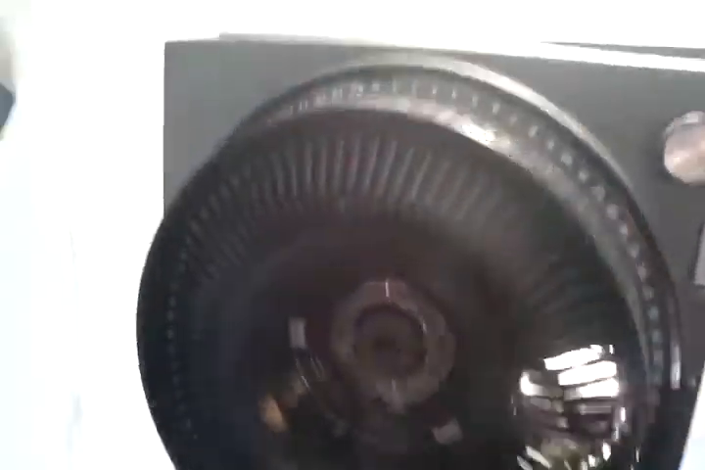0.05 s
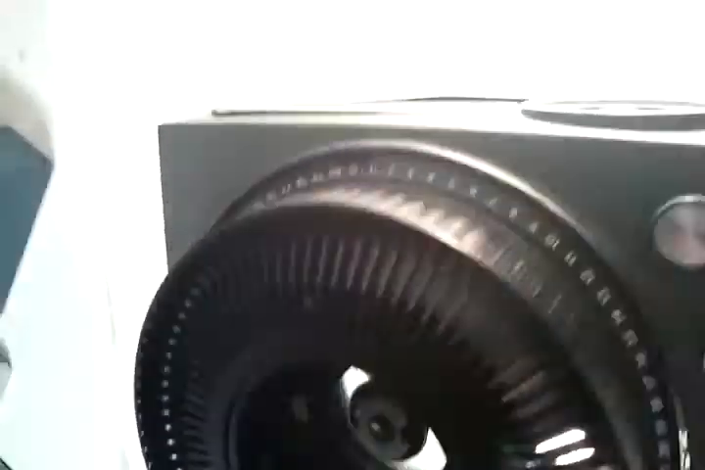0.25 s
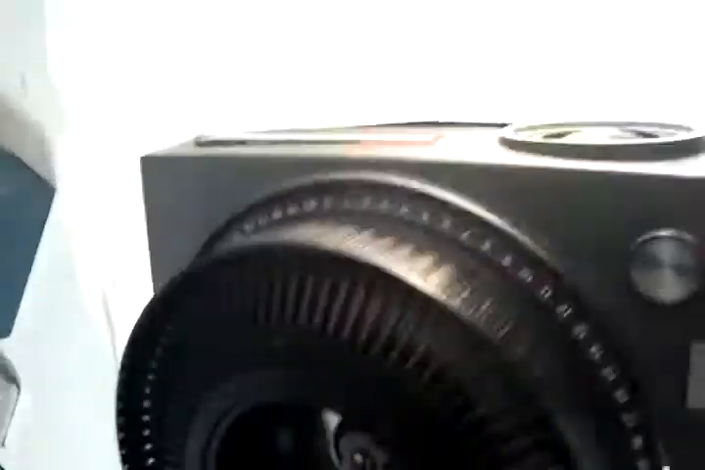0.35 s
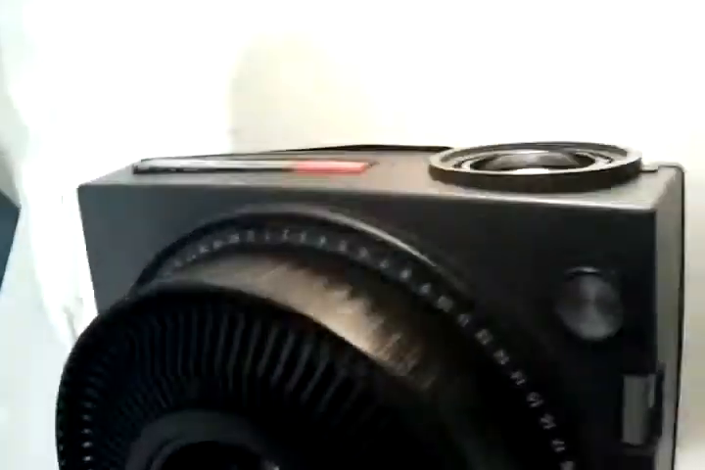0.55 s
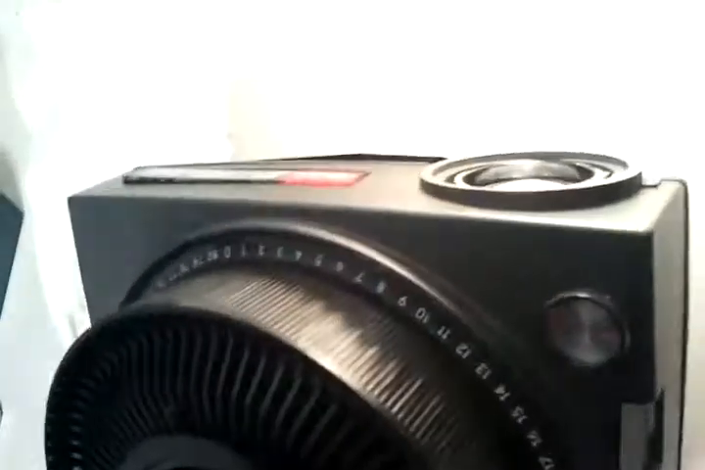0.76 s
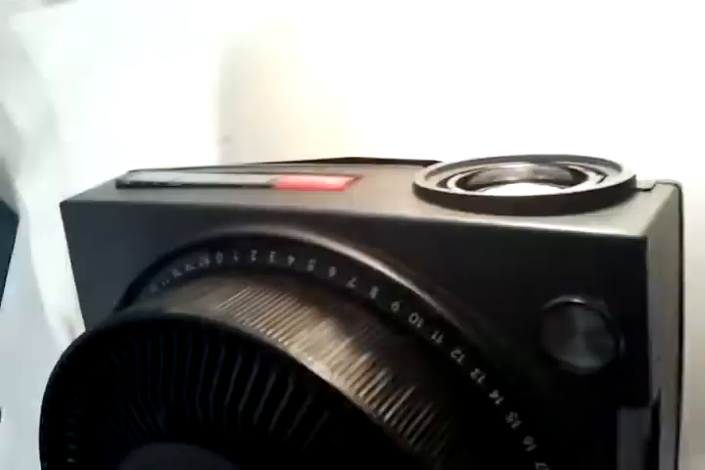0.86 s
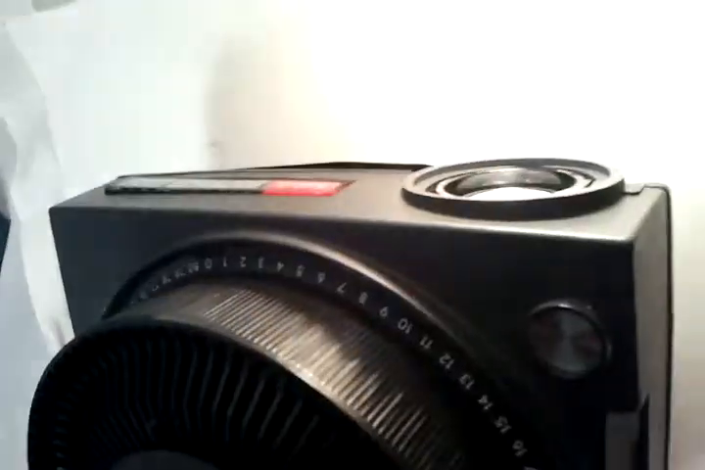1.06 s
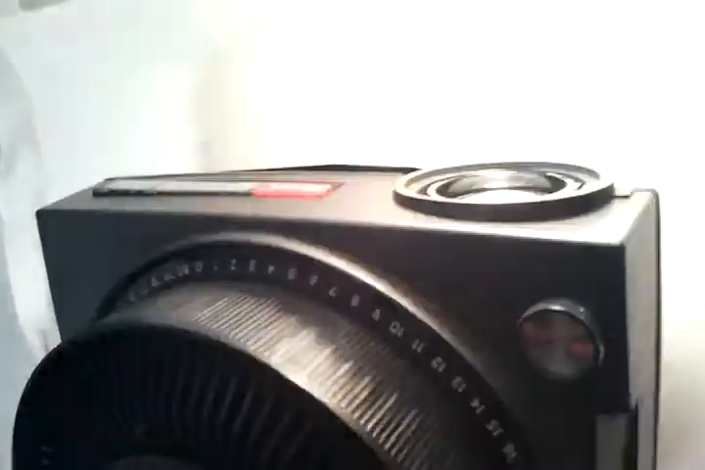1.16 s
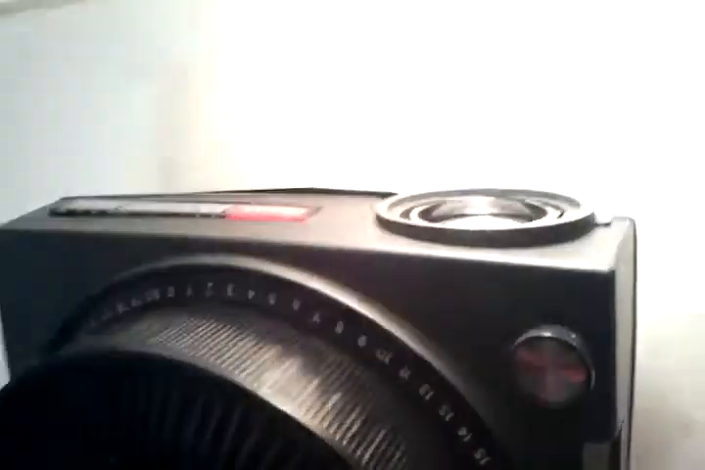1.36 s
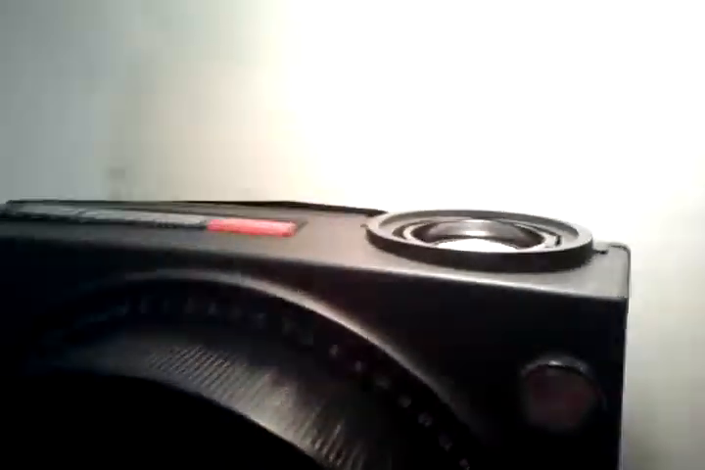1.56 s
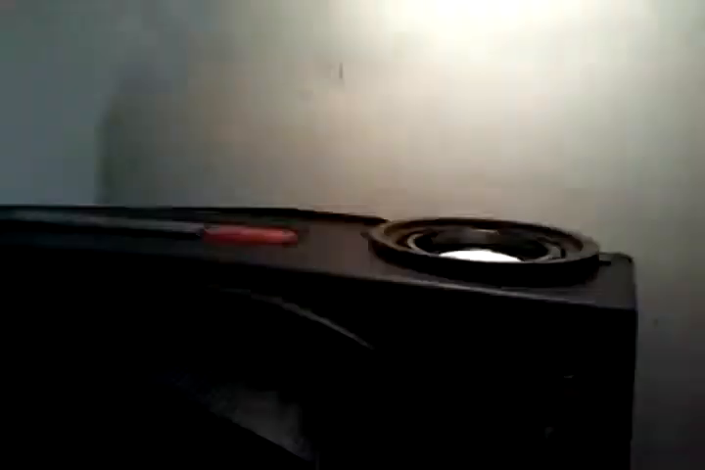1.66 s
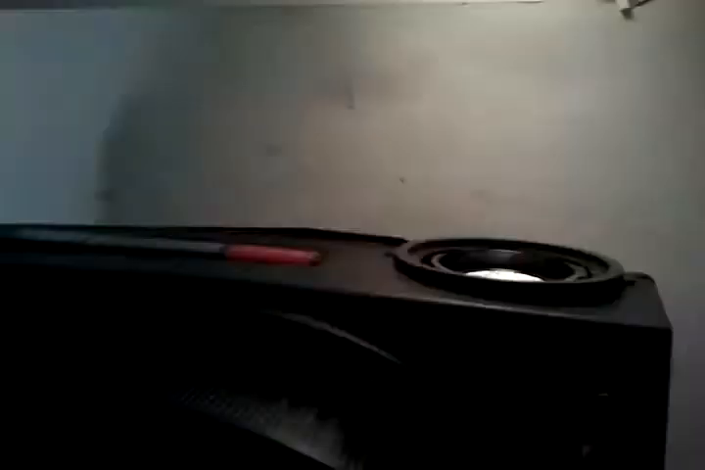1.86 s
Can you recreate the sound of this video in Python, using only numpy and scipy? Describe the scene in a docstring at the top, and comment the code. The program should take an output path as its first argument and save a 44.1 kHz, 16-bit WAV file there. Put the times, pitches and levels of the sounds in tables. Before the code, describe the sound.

Slide projector very close in a small room: a loud distorted clack, faint scrapes and knocks, a slide landing with a small metallic tick, then a second hard clack, over fast ticking, airy fan and low hum.

```python
"""Two clacks of a rotary slide projector changing one slide, close to the microphone in a small room.
Clacks: shaped noise and struck modes, both overloading the input. Between and around them,
tray and slide scrape (noise bursts), and the slide lands with a short ring and thud.
Throughout, the drive ticks twice a turn (pulses through a ringing snap), the fan rushes and whines
(shaped noise, wavering sines) and the motor hums (one sine)."""
import sys
import numpy as np
from scipy import signal
from scipy.fft import rfft, irfft
from scipy.io import wavfile
from scipy.ndimage import uniform_filter1d

SR = 44100
rng = np.random.default_rng(int(sys.argv[2]) if len(sys.argv) > 2 else 0)


def bounce(signal):
    """Save signal as a 16-bit WAV file at the path given by the first command-line argument."""
    frames = np.transpose(np.atleast_2d(signal))
    limited = np.clip(frames, -1, 1)
    pcm = np.round(limited * 32767).astype(np.int16)
    wavfile.write(sys.argv[1], SR, pcm)


N = 83790
TIME_S = np.arange(N) / SR

# clacks: start_s, clatter_db, ring_db, stroke (0 pull, 1 drop)
CLACKS = [(0.2205, 2, -5.5, 0), (1.5878, 2, -1, 1)]
# rebound of the lever, one row per stroke: delay_s, level_db (re first contact)
REBOUNDS = [(.009, -4), (.024, -5.5)]
# clatter spectrum of loose parts, lever pulling in: freq_hz, density_db (relative, per Hz)
PULL_CLATTER_SPECTRUM = [(70, -31), (150, -3), (260, -18.5), (420, 2), (650, -5), (1000, 2.5), (1400, -3),
                         (2300, 6.5), (3300, 2.5), (4900, -4), (7000, 0), (9000, -18.5)]
# same, lever dropping back: freq_hz, density_db (relative, per Hz)
DROP_CLATTER_SPECTRUM = [(40, -24), (150, -30), (260, -17), (420, -8), (650, -9.5), (1100, 10), (1500, 1),
                         (2300, 7), (3300, 9), (4900, -1), (7000, 6), (9000, -11)]
# modes of the mechanism: freq_hz, t60_s, pull_db, drop_db (both re ring_db)
MECHANISM_MODES = [(466.4, 0.14, -12, -18), (538, 0.39, -38, -30.5), (1050, 0.056, -4.5, -7),
                   (1128, 0.11, -27, -20), (1591, 0.1, -10.5, -11.5), (1987, 0.19, -6, -8),
                   (2061, 0.16, -26, -14.5), (2165, .12, -2, -14), (2263, 0.22, -6, -31),
                   (2305, 0.18, -12, -22), (2618, 0.057, -22, -33), (2676, 0.059, -21, -8),
                   (2760, 0.19, -10.5, -15), (3099, 0.073, -28, -2), (3388, 0.1, -6, -34),
                   (3800, 0.18, -17, -15), (5526, 0.14, -11, -45), (6075, 0.12, -21, -10.5),
                   (6230, 0.043, -27, -5.5)]
# scrapes and knocks of lever, tray and slide:
# start_s, rise_s, t60_s, level_db, tilt_db_per_octave, resonance_hz
SCRAPES = [(.192, 0.002, 0.18, -25.5, -2.5, 3400), (0.304, 0.0026, .05, -27.5, -6, 3360),
           (0.372, 0.0045, 0.16, -38, -4, 7000), (0.459, 0.0078, 0.053, -21.5, -2.5, 2330),
           (0.624, 0.0052, 0.057, -29, 0.5, 7930), (0.714, 0.015, .12, -38.5, -1, 7850),
           (0.756, 0.0034, 0.053, -30, -2, 2040), (.776, 0.0058, 0.15, -41, 3, 7760),
           (0.8689, 0.003, 0.022, -23.5, -0.5, 8080), (.872, 0.0055, 0.047, -27.5, -4.5, 870),
           (0.881, 0.0067, .07, -26.5, -4.5, 2030), (1.271, 0.005, 0.044, -21.5, 0, 6800),
           (1.281, .002, 0.049, -24, -6.5, 4000), (1.296, 0.0099, 0.099, -15, 1.5, 2366),
           (1.517, .002, 0.045, -35, -3, 7000), (1.558, 0.0032, 0.17, -24.5, -1.5, 1200),
           (1.665, .012, .06, -28.5, -7, 2040), (1.735, .012, 0.086, -36, -3, 5500),
           (1.826, 0.0063, 0.067, -22, 2, 1950)]
# common scrape spectrum: freq_hz, density_db (relative, per Hz)
SCRAPE_SPECTRUM = [(60, -13.5), (200, -8.5), (600, -11), (900, -7.5), (1250, -0.5), (1600, -2.5),
                   (2350, 2.5), (3000, -1.5), (4300, 0.5), (5400, -4.5), (7000, -1.5), (9000, -10)]
# modes of the gate: freq_hz, level_db (re LANDING_DB)
GATE_MODES = [(1550, -2), (2390, -11), (2750, -5), (4175, -22), (4430, 0), (4880, -9), (5915, -16),
              (6460, 1.5)]
# drive wheel speed: time_s, turns_per_s
DRIVE_SPEED = [(0.0, 21.87), (0.2, 22.65), (0.38, 21.81), (0.5, 22.34), (0.63, 21.27), (0.93, 21.47),
               (1.12, 23.09), (1.25, 22.31), (1.37, 23.04), (1.5, 21.88), (1.68, 22.58), (1.78, 21.33),
               (1.9, 21.37)]
# ticks of one turn: place_turns (0-1), level_db (relative)
TICKS = [(.348, -2.5), (.698, 0)]
# tick strength as the load changes: time_s, level_db
TICK_LEVEL = [(0, -17), (.25, -17.5), (.42, -21.5), (.52, -19), (.7, -21), (1.0, -20.5), (1.15, -18.5),
              (1.4, -18.5), (1.55, -21), (1.75, -18), (1.9, -20.5)]
# housing modes after each tick: freq_hz, t60_s, level_db (re HOUSING_DB)
HOUSING_MODES = [(2784, 0.011, 7.5), (3010, 0.09, -1.5), (3180, 0.11, -14), (3560, 0.0096, 10.5)]
# fan whine: time_s, pitch_hz, swell_db
FAN_WHINE = [(0, 772, 1.5), (.15, 779, 3.5), (0.399, 769, 2.5), (0.742, 744, -4), (0.899, 751, 1),
             (1.081, 775.2, 1.5), (1.501, 769.5, 2.5), (1.9, 752.2, 0)]
# fan tones: multiple (of the whine pitch), level_db (rms, before swell)
FAN_TONES = [(.612, -55), (1, -43), (1.388, -46), (3.69, -52.5)]
# air rush through the housing: freq_hz, density_db (relative, per Hz)
AIR_SPECTRUM = [(25, -4), (45, -14), (90, -1), (145, 2.5), (220, -6), (330, 0), (460, 1.5), (640, -4.5),
                (830, 4.5), (1050, 1), (1350, -7), (2000, -5), (3100, -4.5), (3800, -7), (4600, -18),
                (7200, -18), (9000, -33.5)]

CLACK_RISE_S, CLATTER_T60_S, REBOUND_T60_S = 0.0011, 0.1, 0.032
ROOM_DB, ROOM_RISE_S, ROOM_T60_S = -25, 0.024, 0.28
RATTLE_DB, RATTLE_PER_S = 1.8, 300
RING_RISE_S, RING_WAVER_RAD, RING_WAVER_DB = 0.0077, 0.72, 2.4
RESONANCE_DB, RESONANCE_WIDTH_HZ = 9.5, 160
LANDING_S, LANDING_DB, GATE_T60_S = 1.2985, -25, 0.075
THUD_HZ, THUD_DB, THUD_RISE_S, THUD_T60_S = 72, -39, 0.015, 0.11
TICK_HZ, TICK_TIME_CONSTANT_S, TICK_SCATTER_DB = 3133, 0.00038, 1.3
HOUSING_DB, HOUSING_RISE_S = -20, 0.0022
FAN_WAVER_DB, FAN_PITCH_WAVER = 2, 0.00318  # pitch waver: fraction of pitch
HUM_HZ, HUM_DB, HUM_WAVER_DB = 121, -48, 1.4
AIR_DB, AIR_FLICKER_DB = -35.5, 0.6
OVERLOAD, RAIL = 0.67, 0.82  # amplitudes
BASS_EDGE_HZ, LOWPASS_EDGE_HZ, TOP_HZ = 64, 8310, 15700


def undb(db):
    """Decibels to gain."""
    return 10 ** (np.asarray(db) / 20)


def sine(freq_hz, time_s):
    """Sine of constant pitch, zero phase at time 0."""
    return np.sin(2 * np.pi * freq_hz * time_s)


def curve(time_s, value):
    """Breakpoints joined by straight lines."""
    return np.interp(TIME_S, time_s, value)


def walk(steps_per_s):
    """Random wander of spread near 1: smoothed random steps."""
    step = int(SR / steps_per_s)
    held = np.repeat(rng.standard_normal(N // step + 1), step)
    return np.sqrt(2) * uniform_filter1d(held, step)[:N]


def burst(start_s, rise_s, t60_s):
    """Envelope: straight rise, exponential fall."""
    age_s = TIME_S - start_s
    rise = np.clip(age_s / rise_s, 0, 1)
    return rise * np.exp(-np.log(1000) * np.maximum(age_s - rise_s, 0) / t60_s)


def noise(spectrum, tilt_db_per_octave=0, resonance_hz=None):
    """Noise of rms 1, shaped by a spectrum, a tilt above 700 Hz and an optional resonance."""
    freqs_hz = np.maximum(np.fft.rfftfreq(N, 1 / SR), 1)
    points_hz, points_db = np.array(spectrum).T
    shape_db = np.interp(np.log2(freqs_hz), np.log2(points_hz), points_db)
    shape_db = shape_db + tilt_db_per_octave * np.log2(np.maximum(freqs_hz, 700))
    if resonance_hz:
        offset = (freqs_hz - resonance_hz) / RESONANCE_WIDTH_HZ
        shape_db = shape_db + RESONANCE_DB / (1 + offset ** 2)
    shaped = irfft(rfft(rng.standard_normal(N)) * undb(shape_db), N)
    return shaped / shaped.std()


def ring(start_s, freq_hz, t60_s):
    """One struck mode; loose parts make its pitch and level waver."""
    phase_rad = 2 * np.pi * (freq_hz * (TIME_S - start_s) + rng.random())
    phase_rad = phase_rad + RING_WAVER_RAD * walk(70)
    level = burst(start_s, RING_RISE_S, t60_s) * undb(RING_WAVER_DB * walk(120))
    return level * np.sin(phase_rad)


def clacks():
    """The lever hits its stop and rebounds: parts clatter, the mechanism rings, the room answers."""
    out = np.zeros(N)
    for start_s, clatter_db, ring_db, stroke in CLACKS:
        stroke = int(round(stroke))
        delay_s, rebound_db = REBOUNDS[stroke]
        spectrum = [PULL_CLATTER_SPECTRUM, DROP_CLATTER_SPECTRUM][stroke]
        first = burst(start_s, CLACK_RISE_S, CLATTER_T60_S)
        rebound = undb(rebound_db) * burst(start_s + delay_s, CLACK_RISE_S, REBOUND_T60_S)
        room = undb(ROOM_DB) * burst(start_s, ROOM_RISE_S, ROOM_T60_S)
        envelope = np.sqrt(first ** 2 + rebound ** 2 + room ** 2)  # powers add
        rattle = undb(clatter_db + RATTLE_DB * walk(RATTLE_PER_S))
        out += rattle * envelope * noise(spectrum)
        for freq_hz, t60_s, *mode_db in MECHANISM_MODES:
            out += undb(ring_db + mode_db[stroke]) * ring(start_s, freq_hz, t60_s)
    return out


def scrapes():
    """Short, grainy rubs as the tray moves on and the slide shifts: resonant noise bursts."""
    out = np.zeros(N)
    for start_s, rise_s, t60_s, level_db, tilt_db_per_octave, resonance_hz in SCRAPES:
        grain = undb(level_db + 2 * walk(900))
        rub = noise(SCRAPE_SPECTRUM, tilt_db_per_octave, resonance_hz)
        out += grain * burst(start_s, rise_s, t60_s) * rub
    return out


def landing():
    """The slide lands in the gate: short metallic ring, soft thud in the housing."""
    out = np.zeros(N)
    for freq_hz, level_db in GATE_MODES:
        out += undb(LANDING_DB + level_db) * ring(LANDING_S, freq_hz, GATE_T60_S)
    thud = burst(LANDING_S, THUD_RISE_S, THUD_T60_S) * sine(THUD_HZ, TIME_S - LANDING_S)
    return out + undb(THUD_DB) * thud


def drive():
    """Two sharp ticks per turn of the wheel, each with a brief ring in the housing."""
    turns = np.cumsum(curve(*np.array(DRIVE_SPEED).T)) / SR
    pulses = np.zeros(N)
    for place_turns, level_db in TICKS:
        at = np.searchsorted(turns, np.arange(place_turns, turns[-1], 1))
        pulses[at] = undb(level_db + TICK_SCATTER_DB * rng.standard_normal(len(at)))
    pulses = pulses * undb(curve(*np.array(TICK_LEVEL).T))

    age = TIME_S / TICK_TIME_CONSTANT_S
    swell = (age / 2) ** 2 * np.exp(2 - age)  # peaks at 1 after two time constants
    tick = swell * sine(TICK_HZ, TIME_S)
    for freq_hz, t60_s, level_db in HOUSING_MODES:
        envelope = burst(0, HOUSING_RISE_S, t60_s)
        tick += undb(HOUSING_DB + level_db) * envelope * sine(freq_hz, TIME_S)
    return signal.fftconvolve(pulses, tick)[:N]


def fan():
    """Wavering sines locked to one changing pitch, over rushing air."""
    time_s, pitch_hz, swell_db = np.array(FAN_WHINE).T
    whine_hz = curve(time_s, pitch_hz) * (1 + FAN_PITCH_WAVER * walk(29.32))
    phase_rad = 2 * np.pi * np.cumsum(whine_hz) / SR
    tones = np.zeros(N)
    for multiple, level_db in FAN_TONES:
        tone_db = level_db + curve(time_s, swell_db) + FAN_WAVER_DB * walk(18.03)
        tones += undb(tone_db) * np.sin(multiple * phase_rad)
    air = undb(AIR_DB + AIR_FLICKER_DB * walk(40.31)) * noise(AIR_SPECTRUM)
    return np.sqrt(2) * tones + air  # sqrt(2): tone levels are rms


def motor_hum():
    """Motor hum: one sine of wavering level."""
    level = undb(HUM_DB + HUM_WAVER_DB * walk(12))
    return np.sqrt(2) * level * sine(HUM_HZ, TIME_S)  # level is rms


def scene():
    """Sum of all projector parts, one channel."""
    return (clacks() + scrapes() + landing() + drive() + fan() + motor_hum())[None]


def record(dry):
    """Overloaded input flattens the clacks, a steep low-pass dulls them, peaks above the rail clip again."""
    flat = dry / (1 + (dry / OVERLOAD) ** 4) ** (1 / 4)
    bass_cut = signal.butter(2, BASS_EDGE_HZ, "highpass", fs=SR, output="sos")
    steep_lowpass = signal.butter(26, LOWPASS_EDGE_HZ, fs=SR, output="sos")
    narrow = signal.sosfilt(steep_lowpass, signal.sosfilt(bass_cut, flat))
    clipped = np.clip(narrow, -RAIL, RAIL)
    top_cut = signal.ellip(8, 0.1, 50, TOP_HZ, fs=SR, output="sos")
    return signal.sosfiltfilt(top_cut, clipped)


dry = scene()
out = record(dry)
bounce(out)
```